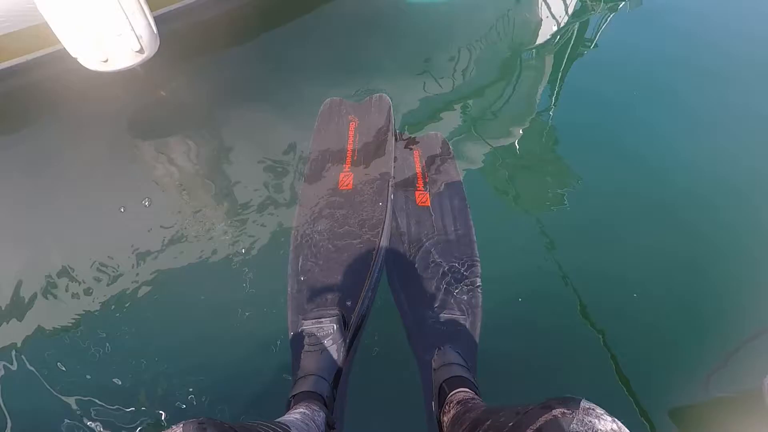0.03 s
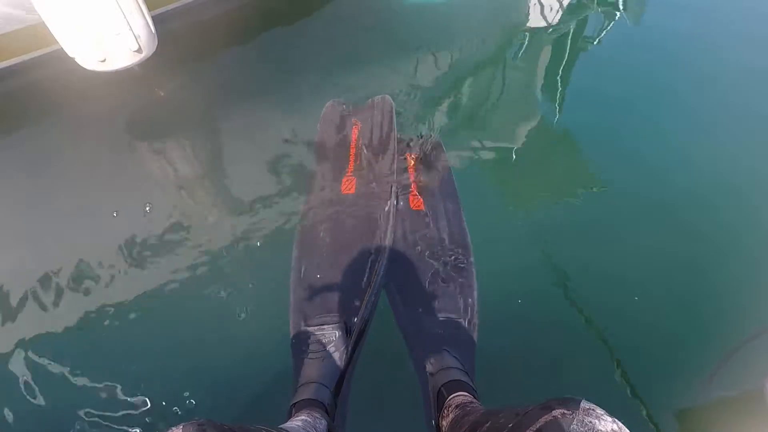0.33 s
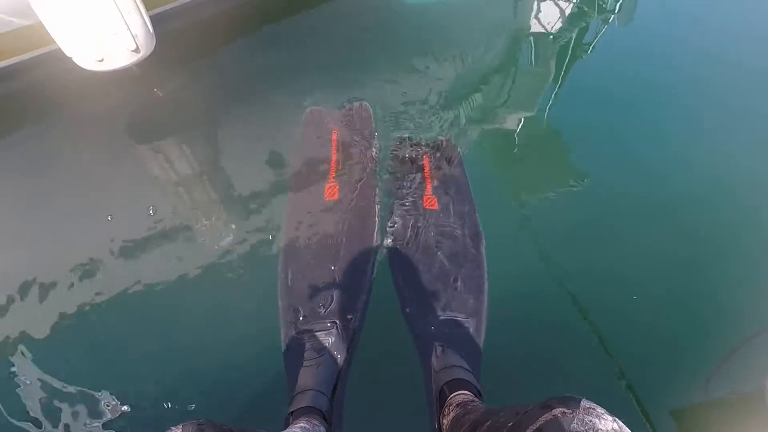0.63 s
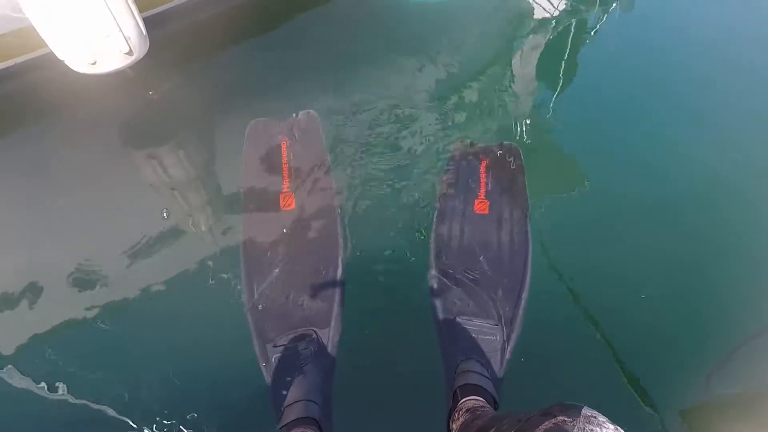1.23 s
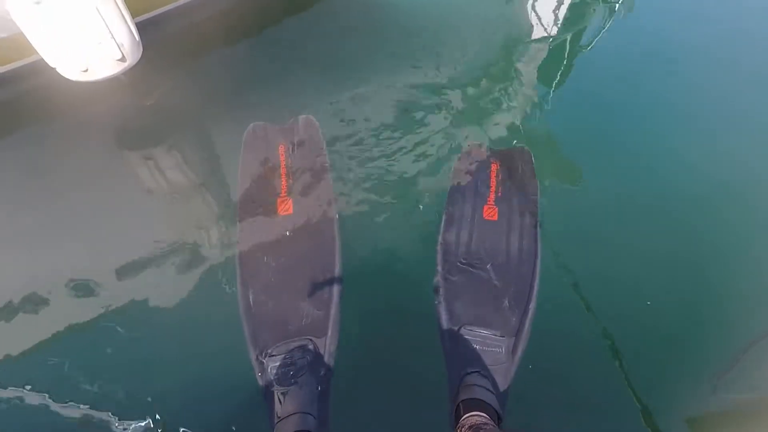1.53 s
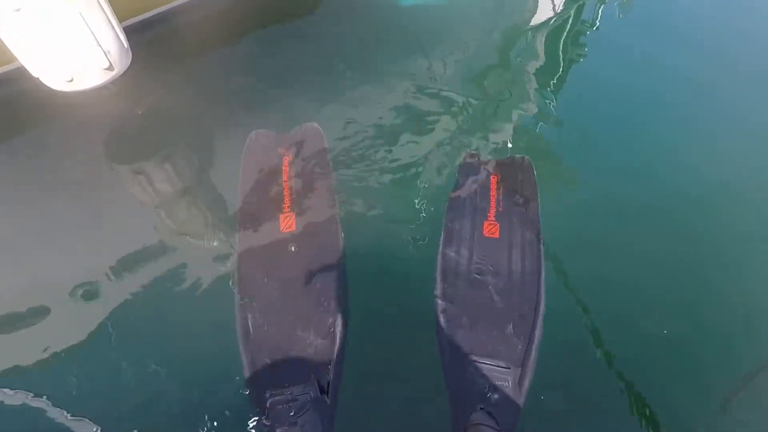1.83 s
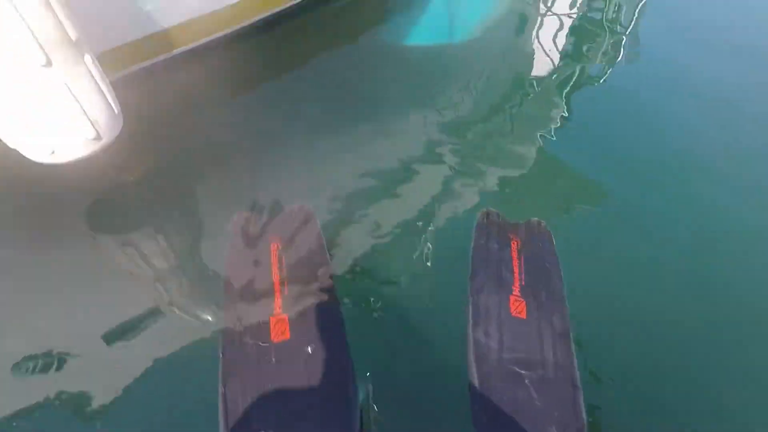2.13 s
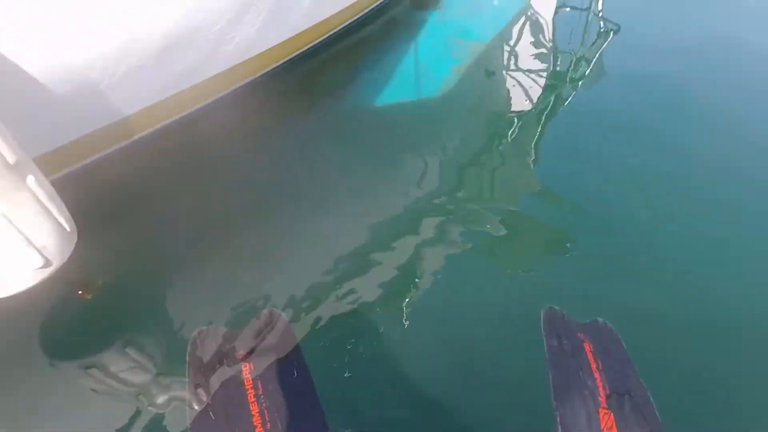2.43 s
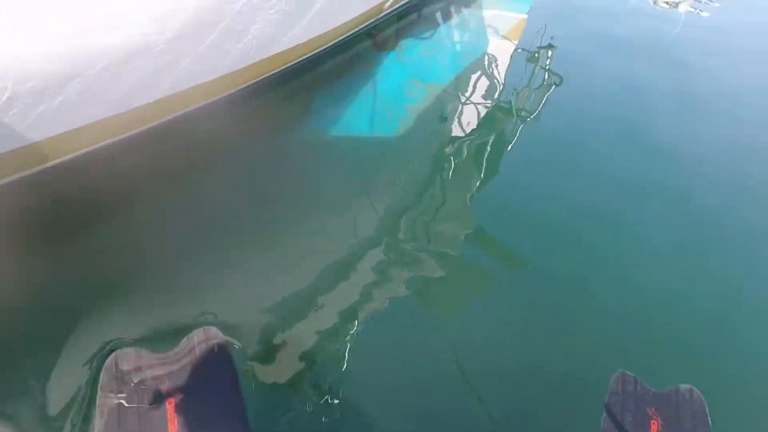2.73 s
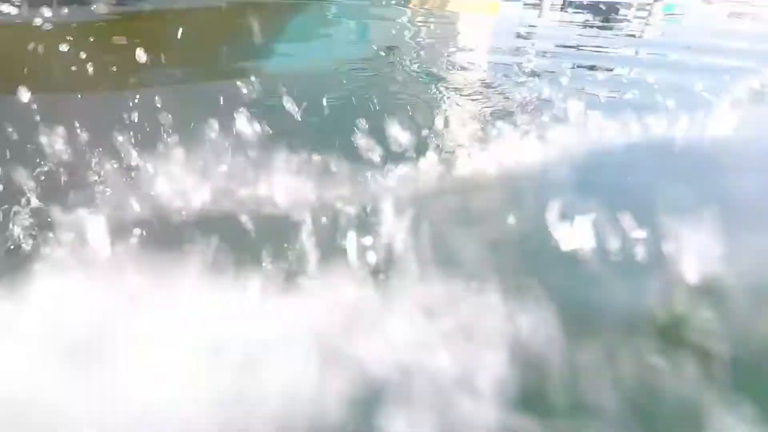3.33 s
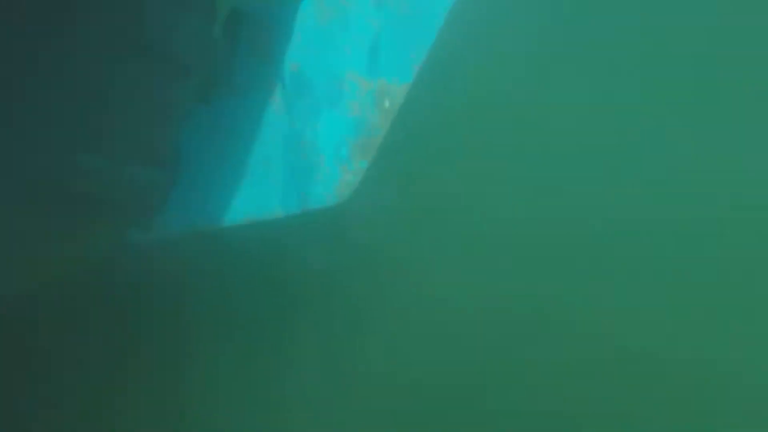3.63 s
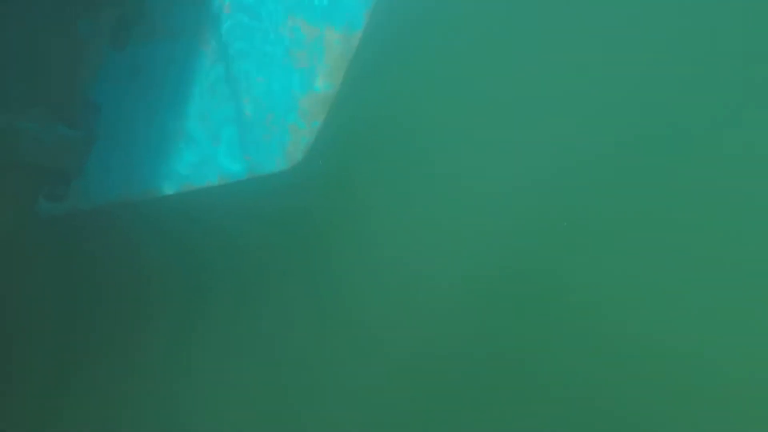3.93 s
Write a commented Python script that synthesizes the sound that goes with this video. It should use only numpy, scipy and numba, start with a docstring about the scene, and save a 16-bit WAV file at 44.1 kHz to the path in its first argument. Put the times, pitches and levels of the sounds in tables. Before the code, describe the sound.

A diver splashes into water, heard close from a waterproof case. For the first two seconds, water sloshes softly under a boat hull over low handling rumble. Water then swishes round the legs, and the case takes one hard knock at about 2.3 seconds. The splash builds from 2.8 seconds, with spray ticking on the case. From 3.4 seconds, muffled underwater bubbles churn, gulp and gurgle until about 4 seconds.

```python
"""A diver in fins slides off a boat into calm water, heard from a camera in a waterproof case.
First the moving case rumbles and water sloshes under the hull. Around 2 s water swishes round
the legs and the case takes one hard knock. Near 3 s the body splashes in and spray hits the case.
At about 3.4 s the water closes over it and the spray is gone: big bubbles gulp and small ones
gurgle, dull and close. Each bubble is a pocket of air that rings for a moment."""
import sys
import numpy as np
from scipy import signal
from scipy.fft import rfft, irfft
from scipy.io import wavfile
from scipy.ndimage import uniform_filter1d, minimum_filter1d
from numba import njit

SR = 44100
rng = np.random.default_rng(int(sys.argv[2]) if len(sys.argv) > 2 else 0)


def dump(signal):
    """Clip the signal to [-1, 1] and save it as 16-bit WAV at the path in sys.argv[1]."""
    limited = np.clip(np.atleast_2d(signal).T, -1, 1)
    pcm = np.round(limited * 32767).astype(np.int16)
    wavfile.write(sys.argv[1], SR, pcm)


N = 176400  # 4 seconds

# How loud each sound is as time passes: t/s, level/dB
SWISH_LEVEL = [(1.5, -70), (1.8, -55.5), (1.95, -46), (2.1, -33), (2.17, -43), (2.24, -42.5), (2.35, -36.5),
               (2.48, -33.5), (2.56, -40.5), (2.63, -46), (2.8, -54)]  # water round the legs
SPLASH_LEVEL = [(2.76, -40), (2.83, -31.5), (2.92, -23), (3.0, -23), (3.045, -28.5), (3.11, -21.5),
                (3.16, -20), (3.21, -13), (3.26, -20), (3.3, -15.5), (3.36, -15.5), (3.395, -23),
                (3.445, -13), (3.5, -34), (3.56, -49)]  # the body going in
FIZZ_LEVEL = [(1.4, -65), (1.75, -57), (2.3, -58), (2.8, -60.5), (3.05, -57.5), (3.22, -50.5), (3.33, -60),
              (3.4, -67)]  # fizz near 9 kHz
SPRAY_LEVEL = [(1.5, -78), (1.85, -66), (2.03, -53), (2.22, -66), (2.42, -68), (2.56, -55), (2.68, -67),
               (2.8, -63), (2.92, -50.5), (3.06, -56), (3.21, -44), (3.33, -53), (3.38, -94)]  # the finest spray, from about 12 kHz up
CHURN_LEVEL = [(3.4, -27), (3.45, -10.5), (3.49, -7.5), (3.54, -17.5), (3.58, -8), (3.6, -24), (3.65, -6),
               (3.69, -15), (3.73, -20), (3.77, -44)]  # the cloud of air that closes over the case
GURGLE_LEVEL = [(3.68, -40.5), (3.74, -19.5), (3.83, -22.5), (3.88, -22), (3.93, -28.5), (3.97, -27),
                (4.0, -25)]  # the bubbles it leaves
CRACKLE_LEVEL = [(3.4, -66), (3.45, -46.5), (3.49, -54), (3.55, -61), (3.62, -66), (3.66, -55), (3.7, -67),
                 (3.74, -91)]  # tiny bubbles bursting on the case
SLOSH_LEVEL = [(.08, -41.5), (.15, -36.5), (.27, -42.5), (.38, -36), (.55, -42), (.9, -48), (1.03, -39),
               (1.3, -44.5), (1.7, -39), (1.85, -44), (2.05, -31.5), (2.2, -36), (2.42, -33), (2.62, -41.5),
               (2.85, -30), (3.3, -26.5)]  # water against the hull and fins
AIR_LEVEL = [(.07, -51.5), (.4, -55), (.9, -55.5), (1.4, -53.5), (1.8, -54), (3.35, -53.5), (3.5, -66)]  # quiet hiss in the air
# The case's deepest and upper rumble, before a small lift and flutter: t/s, level/dB
DEEP_LEVEL = [(0.08, -24.5), (0.47, -20.5), (0.64, -28.5), (0.91, -32), (0.99, -22.5), (1.44, -30),
              (2.2, -19.5), (2.26, -34), (2.29, -11), (2.32, -20), (3.18, -16.5), (3.24, -11),
              (3.32, -30.5), (3.46, -10), (3.51, -33), (3.97, -36)]
RUMBLE_LEVEL = [(0.08, -29.5), (0.17, -24), (0.34, -40), (0.38, -19.5), (0.5, -32), (1.9, -25.5),
                (1.93, -17.5), (2.02, -26.5), (2.04, -18), (2.17, -24), (2.36, -20.5), (2.49, -27),
                (2.72, -25.5), (2.95, -34), (3.01, -19.5), (3.34, -17), (3.36, -27), (3.42, -18.5)]

# Each sound's colour, or how strong its lows and highs are next to each other: f/Hz, level/dB
SWISH_COLOUR = [(250, -14), (420, -1), (750, -2), (1100, -6), (1400, 0), (1650, -3.5), (1850, -13),
                (2200, -19.5), (2900, -31), (3600, -44)]
SPLASH_COLOUR = [(120, -6.5), (270, -4.5), (450, -4.5), (650, -9.5), (1000, -8), (1650, -11), (2000, -21),
                 (2850, -32.5), (3400, -47.5), (4500, -49.5), (7000, -53)]
FIZZ_COLOUR = [(6000, -15.5), (7400, -15), (8700, -6), (11000, -13.5), (13000, -15.5)]
SPRAY_COLOUR = [(11300, -21), (12100, -5), (13300, -9), (15300, -11)]
CHURN_COLOUR = [(60, -8.5), (115, 3), (250, -4), (440, -8), (700, -11), (1100, -10), (1450, -24.5),
                (2100, -35.5), (3100, -49.5), (4500, -67.5), (8000, -71.5)]
GURGLE_COLOUR = [(70, -18.5), (170, 0), (300, -3.5), (400, -18.5), (560, -8.5), (780, -1.5), (1000, -11),
                 (1250, -16), (1500, -39), (1750, -43.5), (2100, -44.5), (3500, -58.5)]
BURST_COLOUR = [(2000, 4.5), (3200, -6), (4500, -5), (6500, -16), (8300, 0), (10000, -4.5), (12500, -12.5),
                (15000, -22)]
CRACKLE_COLOUR = [(2000, 6), (4000, -0.5), (6000, -5), (8500, -6), (10500, -13.5), (13000, -28.5)]
SLOSH_COLOUR = [(110, -8.5), (160, -0.5), (230, -3), (320, -8.5), (480, -17), (700, -28)]
AIR_COLOUR = [(350, -12.5), (600, -1), (1100, -6.5), (1800, -8), (2600, -13), (3600, -17.5), (5500, -16.5),
              (7500, -21), (10000, -18), (12500, -27), (15000, -35.5)]
DEEP_COLOUR = [(14, -8.5), (22, -0.5), (34, -1), (55, 0), (75, -17)]
RUMBLE_COLOUR = [(50, -9), (75, -1), (100, -1.5), (130, -6.5), (175, -12.5), (260, -22.5), (400, -36),
                 (650, -48.5)]

# Single big bubbles: t/s, f/Hz, peak level/dB, decay/s, share the pitch rises by per decay time
# (in one decay time a sound falls to about a third)
BIG_BUBBLES = [(0.602, 1700, -40.5, 0.0051, 0.00084), (2.335, 176, -10.5, 0.0077, 0),
               (2.81, 215, -9, 0.03, 0.059), (2.812, 337, -13, 0.019, 0.022),
               (2.911, 1660, -25, 0.0071, 0.02), (2.965, 620, -31, .011, 0.11),
               (3.0, 1290, -19.5, .006, 0.076), (3.061, 777, -21, 0.011, .04),
               (3.061, 1600, -27.5, 0.013, 0.034), (3.147, 263, -9, 0.0043, 0.062),
               (3.163, 190, -4.5, 0.011, 0.056), (3.172, 1050, -16, 0.0019, 0.075),
               (3.24, 880, -6.5, 0.0048, 0), (3.281, 1480, -17, .003, 0.01), (3.282, 183, -2.5, 0.0055, 0),
               (3.349, 1450, -10.5, 0.0029, 0), (3.36, 1670, -11.5, 0.0031, 0.047),
               (3.36, 879, -6.5, .006, 0), (3.414, 1553, -10.5, 0.0038, 0.028),
               (3.447, 95, -5.5, 0.024, .03), (3.499, 216.4, -8, .014, 0.073),
               (3.51, 950, -17, 0.0047, 0.04), (3.561, 600, -2, 0.0029, 0), (3.562, 895, -5.5, 0.0031, .02),
               (3.599, 720, -11.5, .003, .04), (3.602, 1060, -7, 0.0057, 0.03),
               (3.614, 210, -5.5, 0.01, 0.0059), (3.647, 926, 1, 0.0039, .02),
               (3.66, 251.5, -7.5, 0.027, 0.00097), (3.68, 341, -2.5, 0.0099, 0.026),
               (3.712, 191, -5.5, .005, 0.054), (3.797, 296.6, -23.5, 0.053, 0.013),
               (3.857, 762, -8.5, 0.0084, 0.012), (3.859, 1647, -32, 0.0037, 0),
               (3.89, 740, -6, 0.003, 0.063), (3.891, 1750, -28, 0.0035, 0),
               (3.923, 163, -9, 0.0082, 0.0061), (3.943, 802, -10.5, 0.0027, 0),
               (3.989, 745, -15.5, 0.0017, 0.13), (3.549, 2800, -30, 0.002, 0.0036),
               (3.57, 2730, -37.5, 0.0025, 0), (3.578, 2210, -31.5, .004, 0.023),
               (3.742, 3400, -57, 0.0024, 0.012), (3.859, 2430, -46.5, 0.0033, 0.027),
               (3.878, 3600, -56, 0.0025, 0)]
# The tones of the knocked case: f/Hz, relative level/dB, time to fade by 60 dB/s
CASE_TONES = [(443, -11.5, 0.23), (586, -13, 0.055), (918, -11.5, 0.041), (1120, -6, 0.033),
              (1365, -6, 0.088), (1446, -5, .07), (1604, -4, .035), (1725, -4.5, 0.056), (2100, -21, 0.034),
              (2800, -28, 0.054)]
# Drops and bubbles bursting on the case: t/s, peak level/dB, f/Hz above which the tick is dull
TICKS = [(0.454, -29.5, 900), (1.963, -23.5, 1500), (2.805, -10, 1160), (3.007, -12.5, 1700),
         (3.103, -9, 2240), (3.282, -6.5, 1970), (3.333, -10, 3350), (3.346, -10, 2870), (3.426, -23, 2600),
         (3.442, -14, 2820), (3.588, -24, 1195), (3.619, -10, 1100), (3.653, -21, 3800), (3.661, 3.5, 1440),
         (3.682, -10, 2340), (3.696, -10.5, 2370), (3.714, -5, 1264), (3.735, -2.5, 1195),
         (3.822, -14, 893)]
# Small slaps of water: t/s, peak level/dB, f/Hz
SLAPS = [(.603, -42, 1900), (1.959, -26.5, 1330), (2.569, -16.5, 1310), (2.649, -21, 1450),
         (2.65, -17.5, 554), (2.755, -29.5, 1530)]
# Soft washes of little waves at their loudest: t/s, level/dB, f/Hz, time to swell or fade/s
WAVELETS = [(0.147, -52.5, 970, 0.023), (0.316, -51.5, 1300, 0.028), (0.357, -32.5, 377, .004),
            (0.375, -40, 450, 0.0093), (0.41, -42.5, 516, 0.0096), (1.507, -59, 1760, 0.27),
            (1.996, -48, 1760, 0.31), (2.88, -36, 2050, 0.016)]
# Bursts of spray striking the case: t/s, level/dB before the swell and fade, decay/s
SPRAY_BURSTS = [(.603, -46, 0.0055), (2.95, -41, .003), (3.005, -37, 0.0031), (3.19, -37, 0.0044),
                (3.282, -36, 0.0051), (3.331, -25.5, 0.0036), (3.344, -31, 0.0026), (3.424, -41, .006),
                (3.438, -32, 0.0095)]


def swish_and_splash():
    """Water swishes round the legs, then the body throws up a splash and fine spray."""
    swish = froth(355, 4160, cycles=2.9, spread_db=0, noise_db=-1, rise=0.021, count=9000)
    splash = froth(152.4, 5000, cycles=5, spread_db=3.5, noise_db=-3, rise=0.049, count=6000)
    fizz = rng.standard_normal(N)
    spray = froth(10900, 17500, cycles=3.2, spread_db=6, noise_db=0, rise=0, count=5000)
    return (colour(swish, SWISH_COLOUR) * fader(SWISH_LEVEL)
            + colour(splash, SPLASH_COLOUR) * fader(SPLASH_LEVEL)
            + colour(fizz, FIZZ_COLOUR) * fader(FIZZ_LEVEL)
            + colour(spray, SPRAY_COLOUR) * fader(SPRAY_LEVEL))


def churn_and_gurgle():
    """Air dragged under churns round the case and thins to a gurgle."""
    churn = froth(70, 4000, cycles=2.7, spread_db=3, noise_db=-9.5, rise=0.041, count=6000)
    gurgle = froth(97.6, 2165, cycles=6.2, spread_db=3, noise_db=-16, rise=0.026, count=2800)
    return (colour(churn, CHURN_COLOUR) * fader(CHURN_LEVEL)
            + colour(gurgle, GURGLE_COLOUR) * fader(GURGLE_LEVEL))


def gulps():
    """Big bubbles break free and ring, most of them rising in pitch."""
    out, t = np.zeros(N), np.arange(SR // 4) / SR
    swell = 0.23  # as a share of the decay time
    for start, hz, db, decay, rise in BIG_BUBBLES:
        age = t / decay
        shape = (1 - np.exp(-age / swell)) ** 2 * np.exp(-age)
        tone = np.sin(2 * np.pi * hz * t * (1 + rise * age / 2))
        add(out, start, with_peak(shape, db) * tone)
    return out


def knock():
    """One hard knock: a crack, the hollow ring of the case and a thin zing."""
    out, t = np.zeros(N), np.arange(N) / SR
    start_s, swell_s, crack_decay_s, zing_decay_s = 2.272, 0.0015, 0.0031, 0.011
    hollow = np.zeros(N)
    for hz, db, fade_s in CASE_TONES:
        hollow += undb(db - 60 * t / fade_s) * np.sin(2 * np.pi * (hz * t + rng.random()))
    hollow *= 1 - np.exp(-t / swell_s)
    crack = colour(rng.standard_normal(N), SPLASH_COLOUR) * np.exp(-t / crack_decay_s)
    zing = colour(rng.standard_normal(N), SPRAY_COLOUR) * np.exp(-t / zing_decay_s)
    add(out, start_s, with_peak(hollow, db=-2) + undb(-7) * crack + undb(-34) * zing)
    return out


def ticks_and_slaps():
    """Drops and bursting bubbles tick on the case, and little waves slap nearby."""
    out, t = np.zeros(N), np.arange(SR // 16) / SR
    tick_decay_s, slap_decay_s = 0.0007, 0.0025
    for start, db, top_hz in TICKS:
        push = np.exp(-t / tick_decay_s) * (1 + 0.22 * rng.standard_normal(len(t)))
        add(out, start, with_peak(band(push, top_hz / 4, top_hz), db))
    for start, db, hz in SLAPS:
        push = t * np.exp(-t / slap_decay_s) * rng.standard_normal(len(t))
        add(out, start, with_peak(band_around(push, hz), db))
    return out


def wavelets_and_spray():
    """Little waves wash by; spray hits the case, mostly just before it goes under."""
    out, t = np.zeros(N), np.arange(N) / SR
    for loudest_s, db, hz, fade_s in WAVELETS:
        wash = unit(band_around(rng.standard_normal(N), hz))
        out += undb(db) * wash * np.exp(-((t - loudest_s) / fade_s) ** 2)
    swell = 1 - np.exp(-t / 0.0014)
    for start, db, decay in SPRAY_BURSTS:
        spray = colour(rng.standard_normal(N), BURST_COLOUR)
        add(out, start, undb(db) * spray * swell * np.exp(-t / decay))
    return out


def crackle():
    """Tiny bubbles burst on the case as it goes under: sharp clicks of uneven size."""
    clicks_per_s, spread_db = 450, 6.5
    clicks = (rng.random(N) < clicks_per_s / SR) * undb(spread_db * rng.standard_normal(N))
    return colour(clicks, CRACKLE_COLOUR) * fader(CRACKLE_LEVEL)


def slosh():
    """Soft, overlapping gulps of water under the hull."""
    water = froth(110.7, 690, cycles=2.2, spread_db=2.5, noise_db=-4.5, rise=0.04, count=1500)
    return colour(water, SLOSH_COLOUR) * fader(SLOSH_LEVEL)


def rumble():
    """Movement and air shake the case, over a faint hiss."""
    out = colour(rng.standard_normal(N), AIR_COLOUR) * fader(AIR_LEVEL)
    for tone, level, lift_db in (DEEP_COLOUR, DEEP_LEVEL, 1), (RUMBLE_COLOUR, RUMBLE_LEVEL, 0.5):
        shake = colour(rng.standard_normal(N), tone)
        shake /= np.sqrt(uniform_filter1d(shake ** 2, SR // 10))  # even out its loudness over 0.1 s
        flutter_db = wander(steps_per_s=13)
        out += shake * fader(level) * undb(lift_db + flutter_db)
    return out


def froth(low_hz, high_hz, cycles, spread_db, noise_db, rise, count):
    """A swarm of bubbles, each dying down in about `cycles` wobbles, over rushing water."""
    when, pitch, life, strength = rng.random((count, 4)).T
    hz = (np.sqrt(low_hz) + pitch * (np.sqrt(high_hz) - np.sqrt(low_hz))) ** 2
    boost_db = spread_db * np.minimum(-np.log(1 - strength), np.pi)  # a few stand out
    gain = undb(boost_db) * (hz / low_hz) ** 0.75
    decay = cycles * (0.5 + life) / hz
    swarm = ring_bubbles((when * N).astype(np.int64), hz, decay, gain, float(rise))
    return unit(swarm) + undb(noise_db) * rng.standard_normal(N)


@njit
def ring_bubbles(start, hz, decay, gain, rise):
    """Each bubble is a fading pure tone; `rise` bends its pitch upward."""
    out = np.zeros(N)
    for k in range(len(start)):
        for j in range(min(int(6 * decay[k] * SR), N - start[k])):
            t = j / SR
            age = t / decay[k]
            tone = np.sin(2 * np.pi * hz[k] * t * (1 + rise * age / 2))
            out[start[k] + j] += gain[k] * np.exp(-age) * tone
    return out


def undb(db):
    """Turn decibels into a number to multiply by."""
    return 10 ** (np.asarray(db) / 20)


def unit(x):
    """Scale a sound so its average strength (rms) is 1."""
    return x / np.sqrt(np.mean(x ** 2))


def with_peak(x, db):
    """Scale a sound so its highest peak is at db."""
    return undb(db) * x / np.abs(x).max()


def band(x, low_hz, high_hz):
    """Keep the part of a sound between two frequencies."""
    return signal.sosfilt(signal.butter(3, [low_hz, high_hz], "band", fs=SR, output="sos"), x)


def band_around(x, hz, width=0.46):
    """Keep the part of a sound near hz."""
    return band(x, hz / (1 + width), hz * (1 + width / 2))


def fader(points):
    """A volume curve through (t/s, level/dB) points; silent soon after either end."""
    t = np.arange(N) / SR
    times, db = np.array(points).T
    outside_s = np.maximum(np.maximum(times[0] - t, t - times[-1]), 0)
    return undb(np.interp(t, times, db)) * np.exp(-outside_s / 0.04)


def colour(x, points):
    """Shape lows and highs by (f/Hz, level/dB) points, falling away past the ends; strength 1."""
    size = 2 * N
    hz, db = np.array(points).T
    octave = np.log2(np.maximum(np.fft.rfftfreq(size, 1 / SR), 1))
    octaves_outside = np.maximum(np.maximum(np.log2(hz[0]) - octave, octave - np.log2(hz[-1])), 0)
    curve_db = np.interp(octave, np.log2(hz), db) - np.minimum(30 * octaves_outside, 70)
    # fold the filter in time so it rings only after a sound, never before
    cepstrum = irfft(np.log(undb(curve_db)))
    cepstrum[1:N] *= 2
    cepstrum[N:] = 0
    response = np.exp(rfft(cepstrum))
    return unit(irfft(rfft(x, size) * response)[:N])


def wander(steps_per_s):
    """A smooth random drift, roughly 1 either way."""
    hold = int(SR / steps_per_s)
    steps = np.repeat(rng.standard_normal(N // hold + 1), hold)
    return 1.75 * uniform_filter1d(uniform_filter1d(steps, hold), hold)[:N]


def add(out, start_s, sound):
    """Mix a sound in at start_s seconds."""
    i = min(int(start_s * SR), N)
    out[i:i + len(sound)] += sound[:N - i]


def scene():
    """All the sounds meet at one microphone, after a moment of silence."""
    sound = (rumble() + slosh() + swish_and_splash() + churn_and_gurgle() + crackle()
             + gulps() + ticks_and_slaps() + wavelets_and_spray() + knock())
    silence_s, fade_in_s = 0.072, 0.0013
    fade_in = np.clip((np.arange(N) / SR - silence_s) / fade_in_s, 0, 1)
    return (sound * fade_in)[None]


def record(dry):
    """A fast limiter turns down peaks that are too loud; then the highest treble is cut."""
    window, top_hz = SR // 250, 15300  # a 4 ms window
    needed_gain = 1 / np.maximum(np.abs(dry), 1)
    smooth_gain = uniform_filter1d(minimum_filter1d(needed_gain, window), window)
    treble_cut = signal.ellip(8, 0.2, 70, top_hz, fs=SR, output="sos")
    return signal.sosfilt(treble_cut, dry * smooth_gain)


dry = scene()
out = record(dry)
dump(out)
```